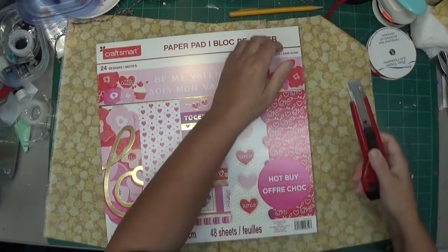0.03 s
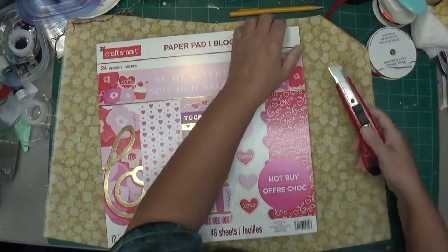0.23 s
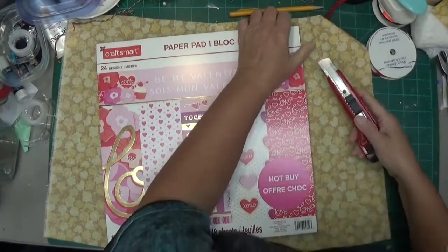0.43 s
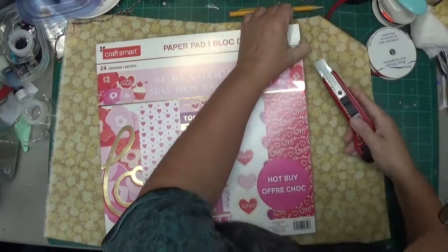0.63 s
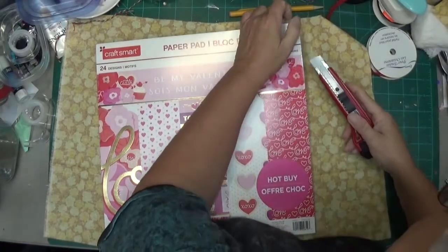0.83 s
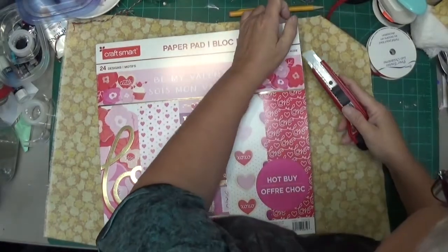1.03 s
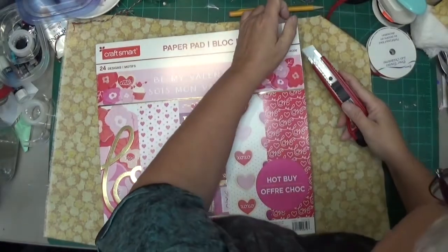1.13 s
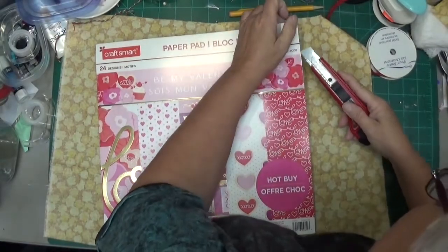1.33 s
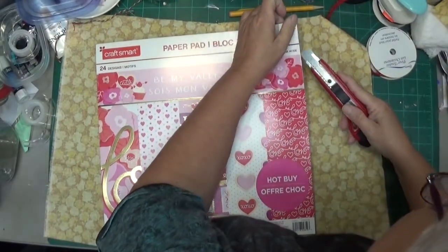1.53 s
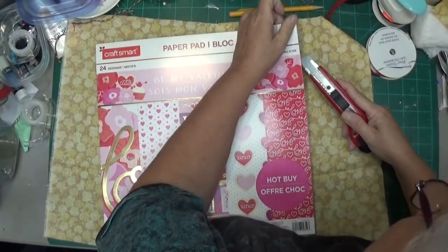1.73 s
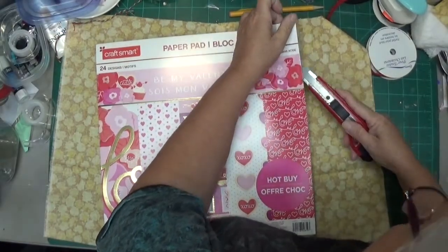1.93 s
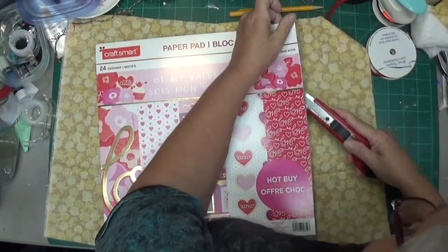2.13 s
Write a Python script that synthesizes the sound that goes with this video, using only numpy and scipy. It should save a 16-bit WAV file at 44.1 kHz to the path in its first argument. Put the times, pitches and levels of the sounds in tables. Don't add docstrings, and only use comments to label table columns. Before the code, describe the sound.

A utility knife slits plastic wrap on a paper pad, close and dry in a small room. Soft taps and low bumps come around 0.1-0.4 s, a brief film rub at 0.75, a flick at 1.05, a sharp snick at 1.2, and a crisp pierce at 1.63. From 1.9 to 2.12, tears and hard knocks cluster, then finger rubbing rises over low hum.

```python
import sys
import numpy as np
from scipy import signal
from scipy.io import wavfile

SR = 44100
rng = np.random.default_rng(int(sys.argv[2]) if len(sys.argv) > 2 else 0)


def generate_wav(sig):
    pcm = np.round(np.clip(np.atleast_2d(sig).T, -1, 1) * 32767).astype(np.int16)
    wavfile.write(sys.argv[1], SR, pcm)


def invert_db(level):
    return 10 ** (np.asarray(level, dtype=float) / 20)


N = 96270

# start in seconds, rise in seconds, hold in seconds, level in dB,
# tilt in dB per octave.
CATCH_EVENTS = [
    (1.2025, 0.0026, 0.00066, -9, 0),
    (1.2135, 0.0013, 0.0036, -32, 2),
]
PIERCE_EVENTS = [
    (1.631, 0.004, .0005, -25, -7),
    (1.6362, 0.00079, 0.0019, -9.5, 1),
    (1.6415, 0.00084, 0.0026, -22, 4.5),
    (1.6462, 0.00068, 0.0016, -19, -1.5),
]
TEAR_EVENTS = [(.1652, 0.00036, 0.00044, -31.5, 0), (.292, 0.005, 0.0506, -45.5, -5),
               (1.935, 0.0043, 0.0022, -35, -1), (1.9445, 0.0041, 0.00079, -20.5, -2),
               (1.9505, 0.0012, 0.0018, -17, -0.5), (1.975, 0.00076, 0.0011, -9.5, -0.5),
               (1.9825, 0.001, 0.00063, -10.5, -2.5), (2.093, 0.00095, 0.0068, -23, -2.5),
               (2.101, 0.0023, 0.0018, -13.5, -2), (2.121, .002, 0.01, -31, 0)]
SNAG_EVENTS = [
    (1.1045, 0.00083, 0.0012, -28, 0),
    (1.109, 0.0016, 0.005, -28.5, 0.5),
    (1.339, 0.0013, 0.0081, -40.5, -3.5),
]
FLICK_EVENTS = [
    (1.051, 0.0021, 0.0039, -22, 0),
    (1.519, 0.00052, 0.0011, -41.5, 2.5),
]
TICK_EVENTS = [(.0985, 0.00096, 0.0051, -27.5, -0.5), (.387, 0.00058, 0.0016, -48, -10),
               (1.9035, 0.0013, 0.0012, -35.5, 6.5), (2.8, .0006, .003, -39, 6),
               (0.62, .0005, .001, -49.5, -11)]
DRAG_EVENTS = [(0.5435, .001, .004, -44, 3), (0.5515, 0.0018, 0.0098, -41.5, 1.5),
               (0.767, 0.009, 0.011, -26.5, 2.5), (1.9, 0.0011, 0.0055, -39, 0.5),
               (2.112, .0004, .0008, -22.5, 6)]
THUMP_EVENTS = [(.165, 0.00045, 0.00059, -33.5, -3), (.3555, 0.0003, 0.002, -31, -15),
                (.4015, 0.00091, 0.0076, -37, -42), (.412, 0.00073, 0.013, -43, -11),
                (.729, 0.0026, 0.0012, -38.5, 7), (1.946, 0.0022, 0.0038, -23.5, 14),
                (1.9842, 0.00075, 0.001, -31, -17), (1.99, 0.0013, 0.028, -31, -2),
                (2.106, 0.001, 0.0009, -36, 9), (2.116, 0.001, 0.0054, -28, -3),
                (1.903, 0.0007, 0.0022, -57, 4), (.293, 0.0027, 0.059, -47, -5),
                (1.205, 0.0014, 0.00093, -34, -2)]
THUD_EVENTS = [(.355, 0.0019, 0.0055, -32, -1), (.381, 0.0034, 0.0086, -32.5, -24),
               (.41, 0.0055, 0.019, -41, 5), (.853, 0.0022, 0.0071, -39.5, 6),
               (1.643, 0.0016, 0.0039, -34, 12.5), (1.984, 0.00062, 0.0084, -30.5, 6),
               (2.106, 0.002, 0.017, -33.5, 23)]

# broad colour rows of Hz and dB per Hz, resonance rows of Hz, width in Hz
# and dB, then fall T60 in seconds, resonance share in dB, left lead in dB.
CATCH_BODY = ([(300, -22.5), (900, -16.5), (2030, -10), (3500, -1), (7950, -12), (11500, -14.5),
               (16000, -46)], [(3080, 190, 0.5), (3830, 150, 0.5), (5200, 510, -22), (7950, 840, 6)],
               0.02, 3.8, -2.4)
PIERCE_BODY = ([(420, -35), (600, -5.5), (1400, -3), (3950, -7), (7200, -10), (10500, -15), (16000, -52)],
                [(638, 50, -7), (1370, 140, -5.5), (2710, 100, 5.5), (4440, 270, 2.5), (5390, 340, 2.5),
                (7350, 460, -10.5)], 0.014, -0.32, -2.6)
TEAR_BODY = ([(600, 0), (2100, -7), (4460, -1), (7830, -2.5), (11000, -34), (16000, -62)],
              [(1520, 130, -6.5), (2870, 300, 1), (4520, 490, -4.5), (7350, 770, -8), (9060, 530, -3.5)],
              0.013, -1.2, -2.8)
SNAG_BODY = ([(900, -26), (1500, -12), (3000, 1), (7950, -8), (11500, -25), (16000, -46)],
              [(1820, 160, -9.5), (3150, 260, 4), (5160, 640, -3), (6470, 400, -8), (7700, 440, -0.5),
              (11000, 480, -17)], 0.02, 3.2, -2)
FLICK_BODY = ([(1400, -19), (2200, 0), (5070, -1), (11000, -23), (16000, -39)], [(2435, 210, 1),
               (3330, 250, -10), (4270, 230, 3.5), (5320, 140, 1.5), (7100, 1000, 0), (10300, 480, -4)],
               0.009, 2.3, -2.4)
TICK_BODY = ([(1200, -22), (2060, 8.5), (5070, -3), (11000, -30.5), (16000, -48)], [(1460, 110, -5),
              (1947, 360, 1.5), (2420, 140, 0.5), (3700, 100, -1.5), (4540, 470, 2), (7430, 780, 8.5)],
              0.043, 4.2, -2.4)
DRAG_BODY = ([(350, 1.5), (1100, -4.5), (2800, -12.5), (4000, -40), (5300, -10), (8000, -9), (16000, -35)],
              [(4280, 1200, 19.5), (5560, 300, -8), (7580, 570, 11.5), (11100, 500, -32)], 0.038, -1, -2.1)
PAD_BODY = ([(300, -9.5), (480, 1), (700, 6.5), (1300, 9), (2500, -10.5), (5000, -5)], [(549, 94, 12),
             (655, 92, 11), (1303, 510, -1.5)], 0.013, 4.4, -0.37)
TABLE_BODY = ([(90, 15.5), (150, 8), (280, -4), (500, -13)], [(145, 30.7, 3.5), (209.5, 16, -1)],
               0.034, 9.6, -.1)

# start in seconds, contact in seconds, level in dB.
KNOCK_EVENTS = [(1.9812, .0005, -4.5), (1.9832, 0.00027, -12), (2.1023, 0.00044, -9.5),
                (2.1046, 0.00048, -6), (2.115, .0005, -13.5), (.3546, 0.00083, -21.5),
                (.1652, 0.00092, -32)]
# frequency in Hz, level in dB, T60 in seconds.
EDGE_MODES = [(626, -6, 0.013), (695, -5.5, 0.027), (1207, -6.5, 0.036), (1480, -2.5, 0.024),
              (2840, -6, 0.011), (4260, -25, 0.009)]
# time in seconds, level in dB.
SCRAPE_LEVEL = [(1.5, -78), (1.52, -56.5), (1.62, -58.5), (1.78, -65.5), (1.88, -55.5), (2.1, -60),
                (2.14, -46), (2.18, -40)]
# time in seconds, level in dB.
SLIDE_LEVEL = [(0, -42.5), (.08, -51.5), (.26, -54), (.34, -52.5), (.5, -54), (.58, -51.5), (.68, -55),
               (.85, -53.5), (1.0, -56), (1.45, -58.5), (1.55, -56), (1.88, -55), (2.08, -50),
               (2.13, -44.5), (2.18, -36)]
# frequency in Hz, level in dB per Hz.
SLIDE_COLOUR = [(300, -2), (600, -0.5), (1500, -0.5), (3000, 0), (5500, -2), (8000, 1.5), (11000, -10),
                (16000, -27)]
# frequency in Hz, level in dB.
AIR_COLOUR = [(20, -22), (55, -9.5), (110, -11), (400, -16), (700, -22), (5500, -38), (8000, -44.5),
              (16500, -38)]
# frequency in Hz, side minus mid in dB.
AIR_SIDE = [(60, -33), (240, -12.5), (950, 2), (3770, 4), (15000, -12)]
# frequency in Hz, width in Hz, level in dB.
HUM_MODES = [(52.6, 24.5, -49), (70.2, 10.6, -52.5)]

EDGES_HZ = 22 * 2 ** np.arange(0, 9.7, .4)
CRACKS_PER_S, CRACK_SPREAD_DB, MODE_CHANCE_DB = 14000, 4, 0.8
SETTLE_DB, SETTLE_T60_S = -19, .14
ROOM_DB, ROOM_T60_S, ROOM_SIDE_DB, WALL_CUT_HZ = -18.5, 0.18, -7, 7800
LATE_DB, LATE_T60_S = -19, 0.29


def rms_one(x):
    return x / np.sqrt(np.mean(x ** 2) + 1e-20)


def at_hz(points, hz):
    p = np.array(points)
    octaves_outside = max(np.log2(p[0, 0] / hz), np.log2(hz / p[-1, 0]), 0)
    return np.interp(np.log(hz), np.log(p[:, 0]), p[:, 1]) - 30 * octaves_outside


def bands():
    return [(np.sqrt(low * high), signal.butter(2, [low, high], "band", fs=SR, output="sos"))
            for low, high in zip(EDGES_HZ, EDGES_HZ[1:])]


def resonate(x, hz, width):
    r = np.exp(-np.pi * width / SR)
    feedback = [1, -2 * r * np.cos(2 * np.pi * hz / SR), r * r]
    return signal.lfilter(np.array([1, 0, -1]) * (1 - r * r) / 2, feedback, x)


def lean_left(x, left_db):
    return x * invert_db([[left_db / 2], [-left_db / 2]])


def cracks(size):
    size_db = CRACK_SPREAD_DB * np.minimum(rng.exponential(1, size), 4)
    clicks = invert_db(size_db) * rng.choice([-1, 1], size)
    return rms_one(clicks * (rng.random(size) < CRACKS_PER_S / SR))


def struck(events, body):
    colour, peaks, fall_t60, ring_db, left_db = body
    out = np.zeros(N + SR)
    t = np.arange(SR // 8) / SR
    bank = bands()
    centre_hz = np.exp(np.mean(np.log([peak[0] for peak in peaks])))
    for start, rise, hold, db, tilt in events:
        after = np.maximum(t - rise - hold, 0)
        swell = np.clip(t / max(rise, 1e-4), 0, 1) ** 2
        shape = swell * invert_db(-60 * after / fall_t60)
        settle = swell * invert_db(SETTLE_DB - 60 * after / SETTLE_T60_S)
        spray = [cracks(len(t)) + 1e-18 for _ in range(2)]
        broad = 0
        for k, (hz, sos) in enumerate(bank):
            if hz > 60:
                band = rms_one(signal.sosfilt(sos, (shape + settle) * spray[k % 2]))
                band_db = at_hz(colour, hz) + tilt * np.log2(hz / centre_hz)
                broad = broad + invert_db(band_db) * np.sqrt(hz) * band
        rings = 0
        for k, (hz, width, peak_db) in enumerate(peaks):
            ring = rms_one(resonate(shape * spray[k % 2] + 1e-18, hz, width))
            mode_db = peak_db + tilt * np.log2(hz / centre_hz) + MODE_CHANCE_DB * rng.normal()
            rings = rings + (-1) ** k * invert_db(mode_db) * ring
        sound = rms_one(rms_one(broad) + invert_db(ring_db) * rms_one(rings))
        i = int(start * SR)
        out[i:i + len(t)] += invert_db(db) * sound * np.sqrt(np.mean(shape ** 2))
    return lean_left(out[:N], left_db)


def knocks():
    out = np.zeros(N + SR)
    t = np.arange(SR // 8) / SR
    ring = sum(invert_db(db - 60 * t / t60) * np.sin(2 * np.pi * hz * t) for hz, db, t60 in EDGE_MODES)
    for start, contact, db in KNOCK_EVENTS:
        push = np.sin(np.pi * np.clip(t / max(contact, 1e-4), 0, 1))
        i = int(start * SR)
        out[i:i + len(t)] -= invert_db(db) * signal.fftconvolve(ring, push)[:len(t)] / push.sum()
    low_cut = signal.butter(2, 430, "high", fs=SR, output="sos")
    return signal.sosfilt(low_cut, out[:N] + 1e-18)


def scrape():
    s, db = np.transpose(SCRAPE_LEVEL)
    creep = rms_one(resonate(cracks(N), hz=2990, width=460))
    return creep * invert_db(np.interp(np.arange(N) / SR, s, db))


def drift(rate):
    r = np.exp(-2 * np.pi * rate / SR)
    return rms_one(signal.lfilter([1], [1, -2 * r, r * r], rng.standard_normal(N + SR))[SR:])


def slide():
    s, db = np.transpose(SLIDE_LEVEL)
    grain = [1.67 * cracks(N) + rng.standard_normal(N) for _ in range(2)]
    hiss = 0
    for k, (hz, sos) in enumerate(bands()):
        if hz > 150:
            patchy_db = at_hz(SLIDE_COLOUR, hz) + 2.3 * drift(24)
            hiss = hiss + invert_db(patchy_db) * signal.sosfilt(sos, grain[k % 2])
    pressure_db = np.interp(np.arange(N) / SR, s, db) + 0.5
    return lean_left(rms_one(hiss) * invert_db(pressure_db), -0.4)


def room(x):
    t = np.arange(SR // 2) / SR
    decay = invert_db(-60 * t / ROOM_T60_S) + invert_db(LATE_DB - 60 * t / LATE_T60_S)
    decay = decay * np.clip(t / 0.014, 0, 1)
    walls = signal.butter(1, WALL_CUT_HZ, fs=SR, output="sos")
    mid, side = signal.sosfilt(walls, rng.standard_normal((2, len(t)))) * decay
    scale = invert_db(ROOM_DB) / np.sqrt(np.sum(mid ** 2))
    side = invert_db(ROOM_SIDE_DB) * signal.sosfilt(signal.butter(1, 300, "high", fs=SR, output="sos"), side)
    return scale * np.array([signal.fftconvolve(x, mid + way * side)[:N] for way in (1, -1)])


def hum():
    drone = 0
    for hz, width, db in HUM_MODES:
        once = resonate(rng.standard_normal(N + SR), hz, width)
        drone = drone + invert_db(db) * rms_one(resonate(once, hz, width)[SR:])
    return drone


def air():
    white = rng.standard_normal((2, 2, N + SR))
    mid, side = 0, 0
    for k, (hz, sos) in enumerate(bands()):
        m, d = invert_db(at_hz(AIR_COLOUR, hz)) * signal.sosfilt(sos, white[k % 2])[:, SR:]
        mid = mid + m
        side = side + d * invert_db(at_hz(AIR_SIDE, hz))
    return invert_db(-51.5) / np.std(mid) * (mid + side * np.array([[1], [-1]]))


def scene():
    blade = (struck(CATCH_EVENTS, CATCH_BODY) + struck(PIERCE_EVENTS, PIERCE_BODY)
             + struck(TEAR_EVENTS, TEAR_BODY) + struck(SNAG_EVENTS, SNAG_BODY))
    film = (struck(FLICK_EVENTS, FLICK_BODY) + struck(TICK_EVENTS, TICK_BODY)
            + struck(DRAG_EVENTS, DRAG_BODY))
    pushes = struck(THUMP_EVENTS, PAD_BODY) + struck(THUD_EVENTS, TABLE_BODY) + knocks()
    near = blade + film + pushes + scrape() + slide()
    return near + room(near.mean(axis=0)) + air() + hum()


def roll_off(x):
    return signal.sosfilt(signal.butter(12, 16660, fs=SR, output="sos"), x)


def record(dry):
    rounded = 1.6 * np.tanh(dry / 1.6)
    top_cut = signal.cheby2(10, 50, 16600, fs=SR, output="sos")
    return roll_off(signal.sosfilt(top_cut, rounded))


dry = scene()
out = record(dry)
generate_wav(out)
```